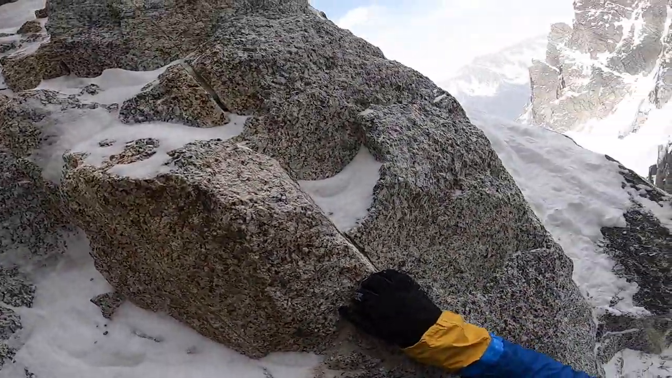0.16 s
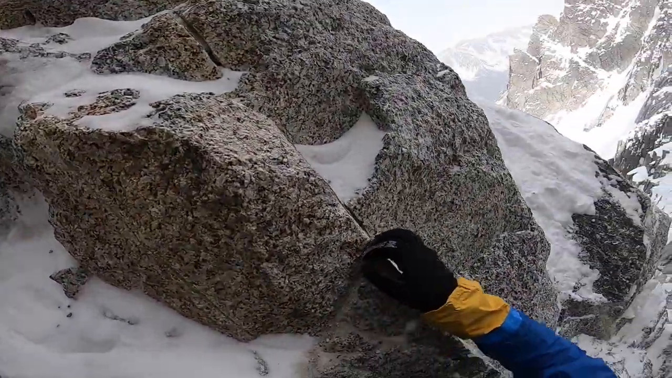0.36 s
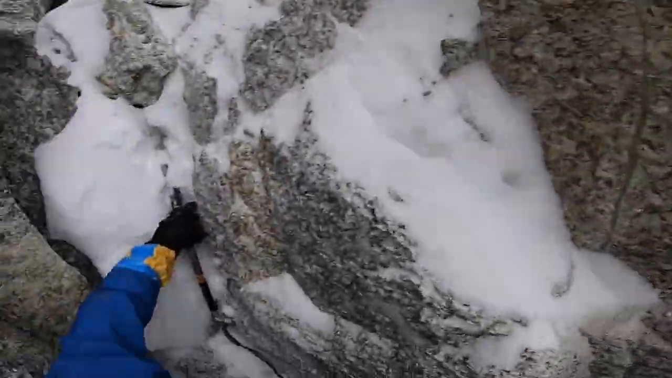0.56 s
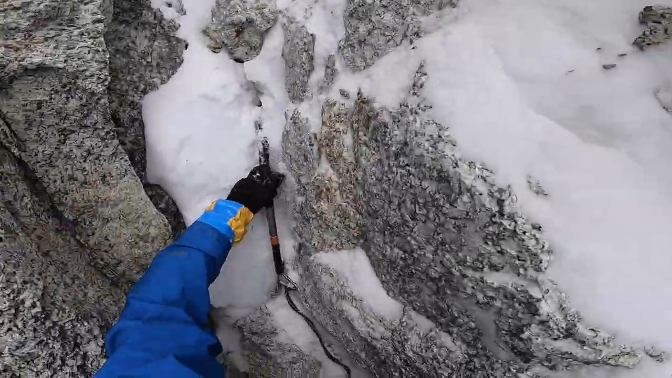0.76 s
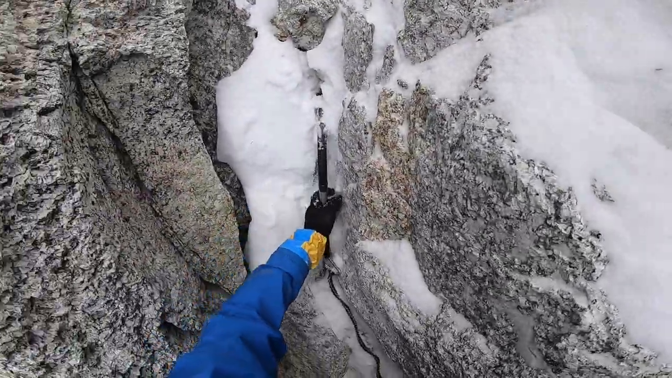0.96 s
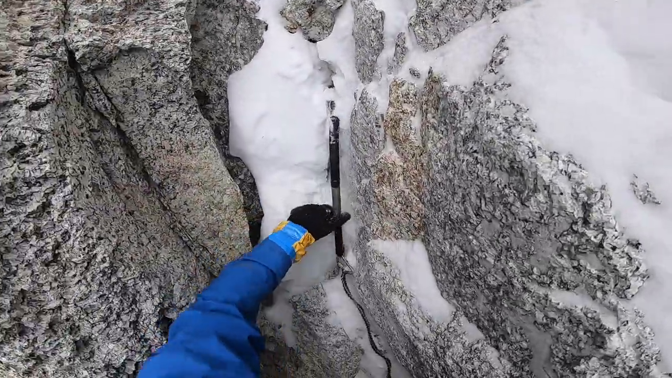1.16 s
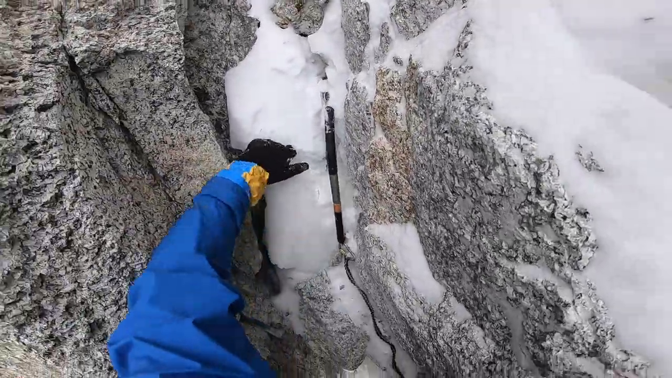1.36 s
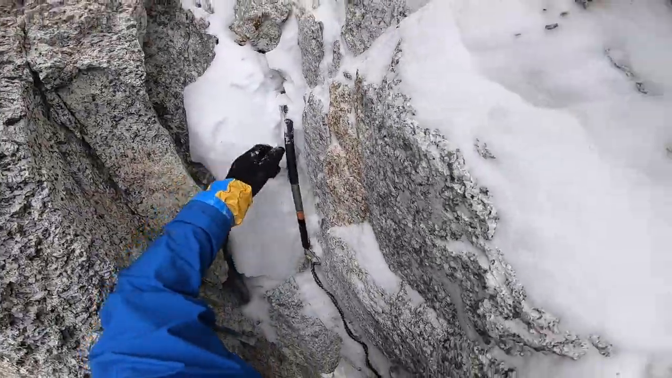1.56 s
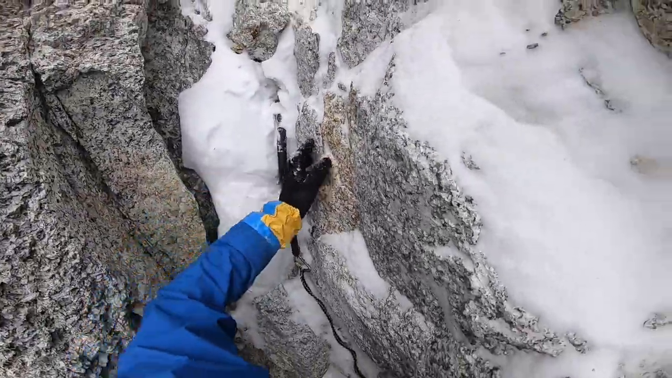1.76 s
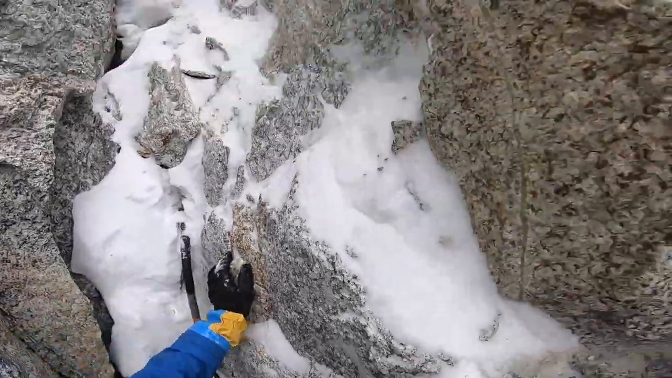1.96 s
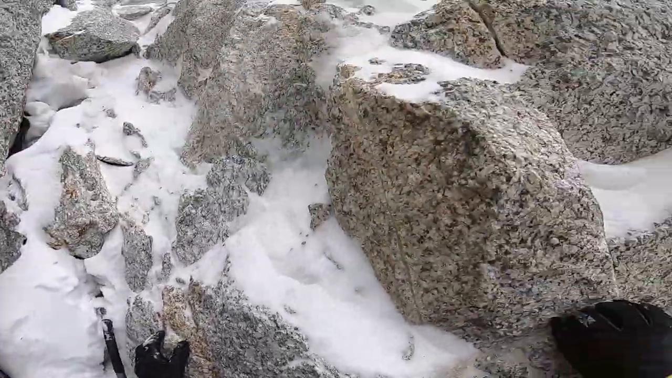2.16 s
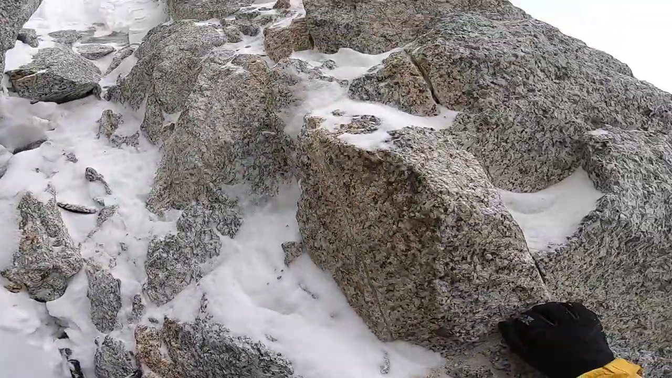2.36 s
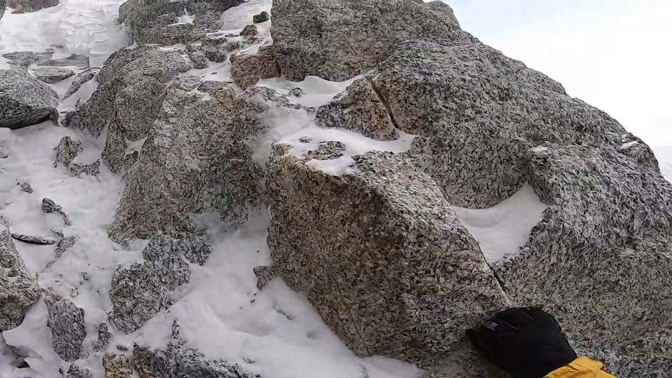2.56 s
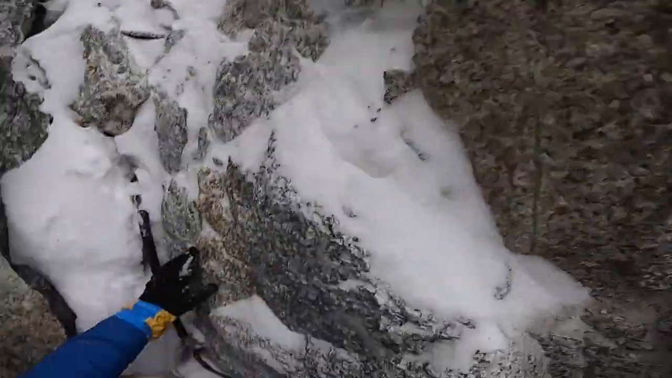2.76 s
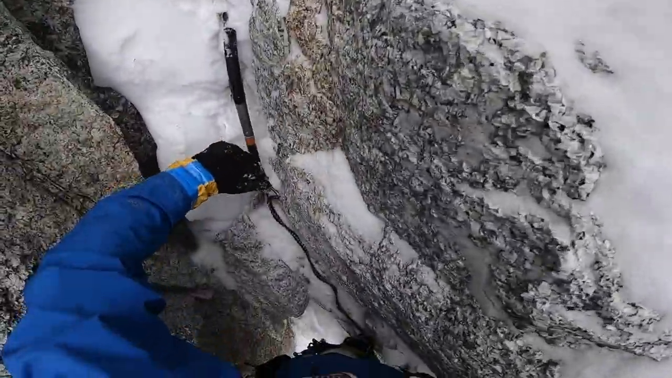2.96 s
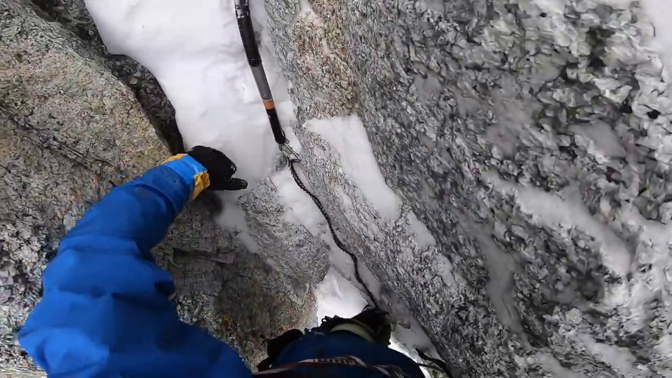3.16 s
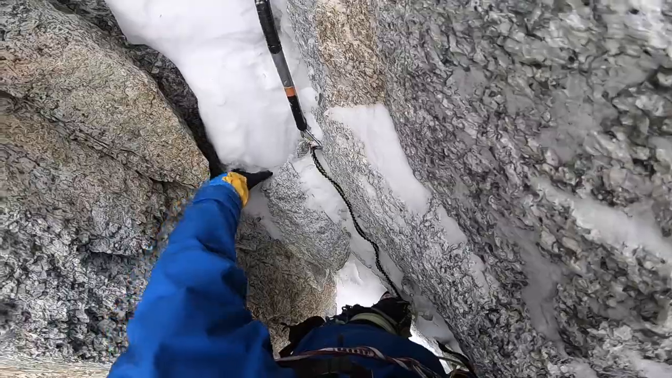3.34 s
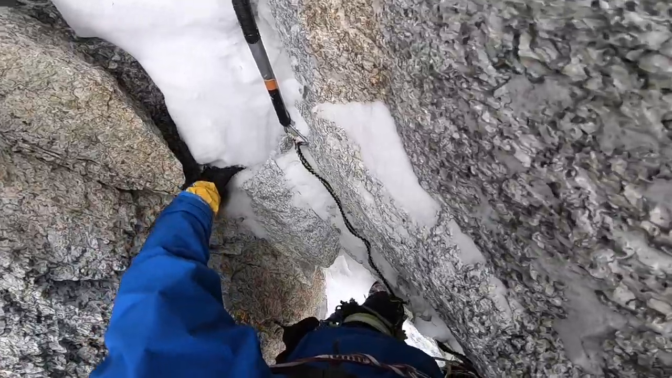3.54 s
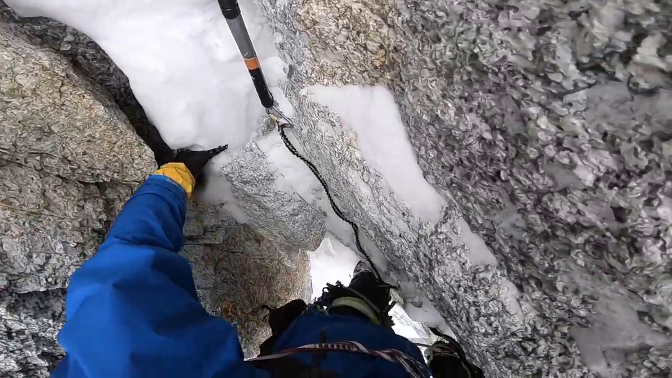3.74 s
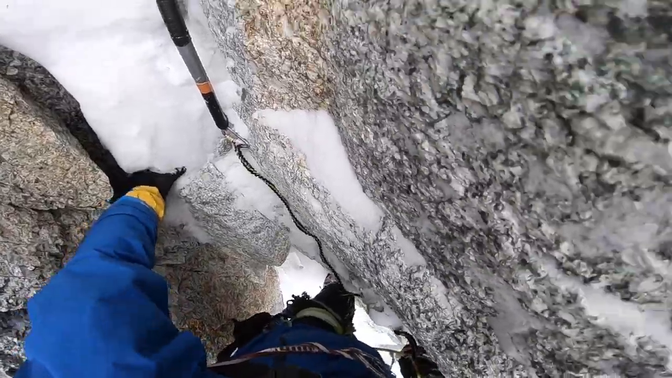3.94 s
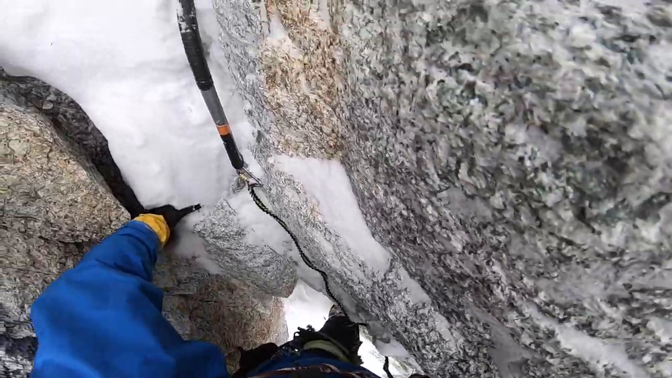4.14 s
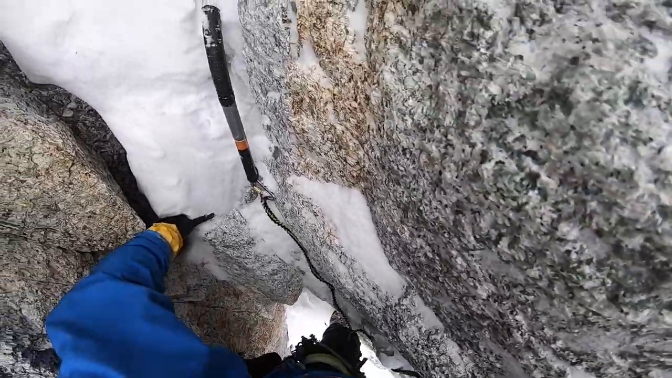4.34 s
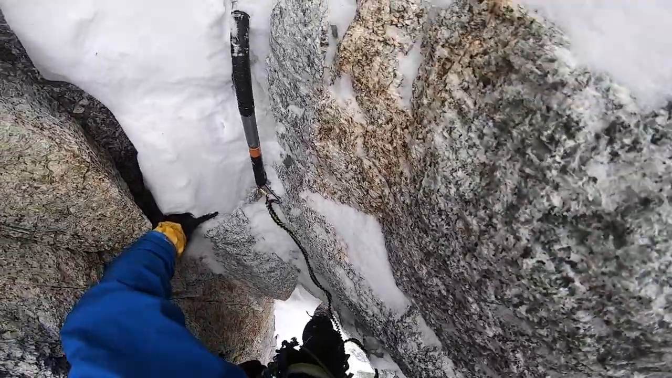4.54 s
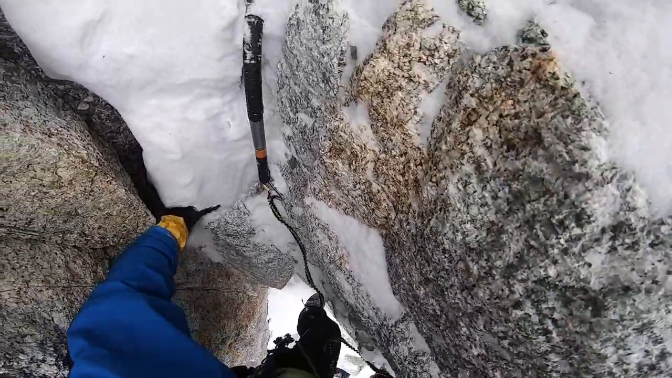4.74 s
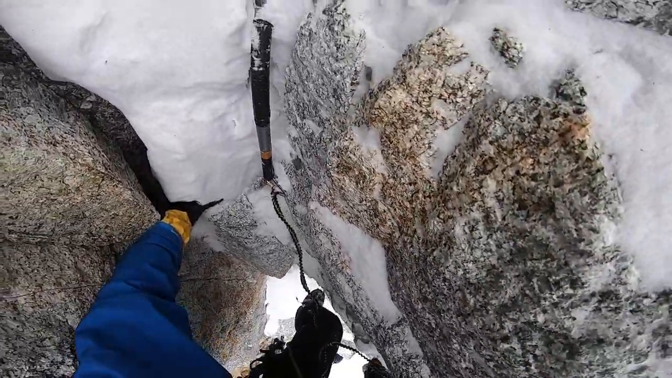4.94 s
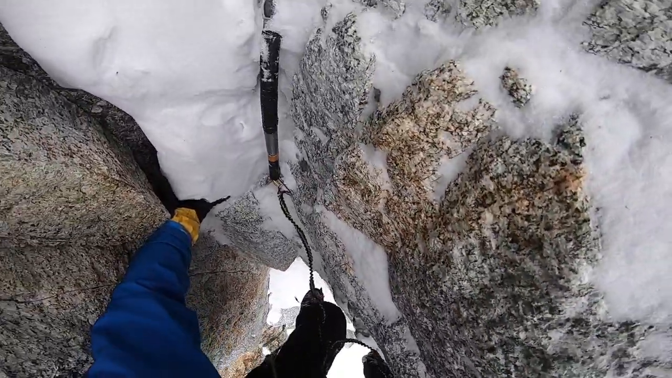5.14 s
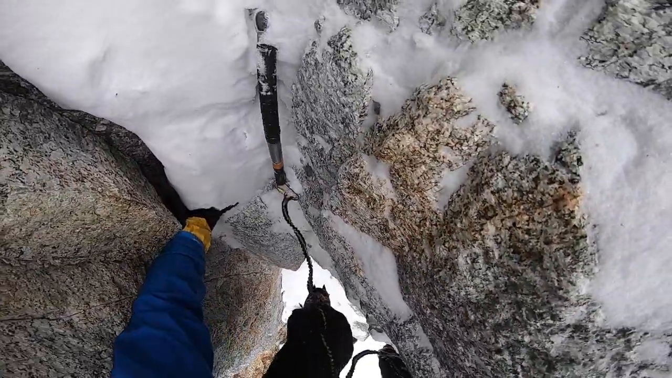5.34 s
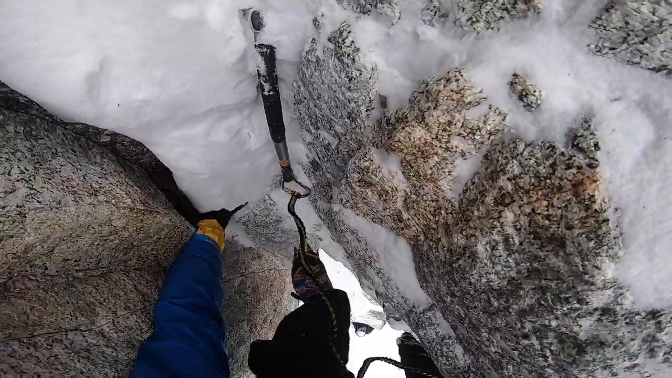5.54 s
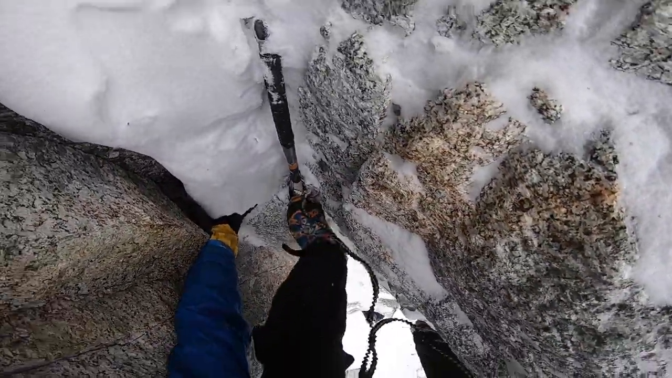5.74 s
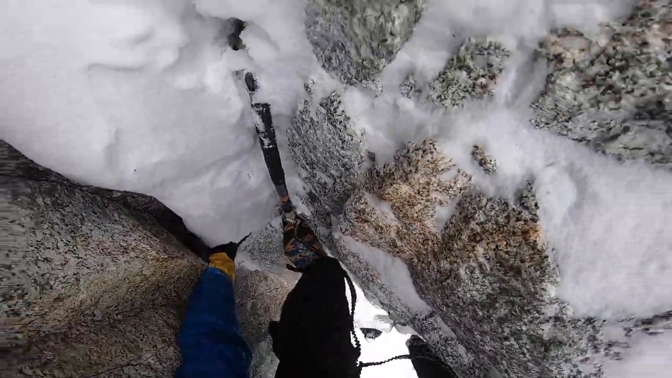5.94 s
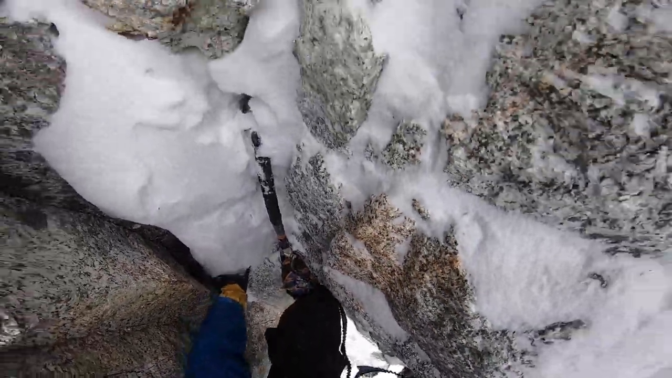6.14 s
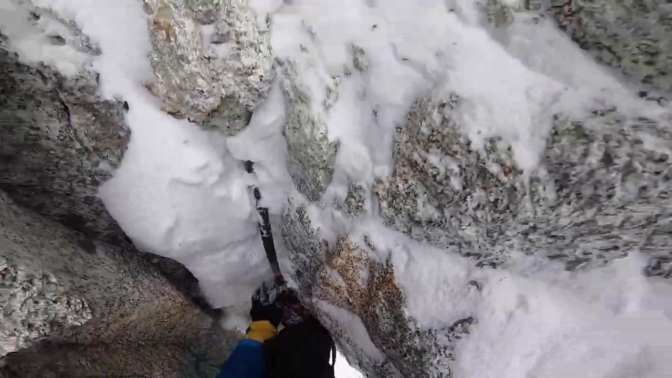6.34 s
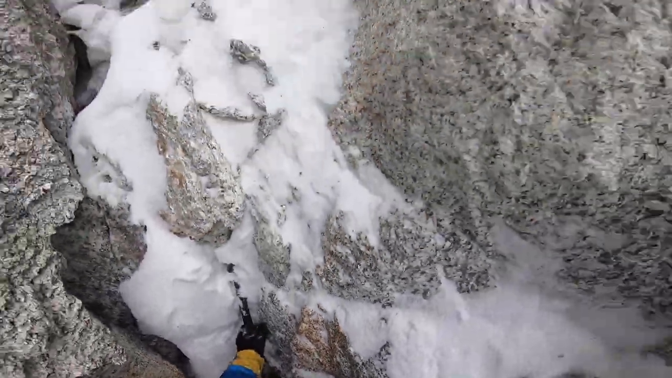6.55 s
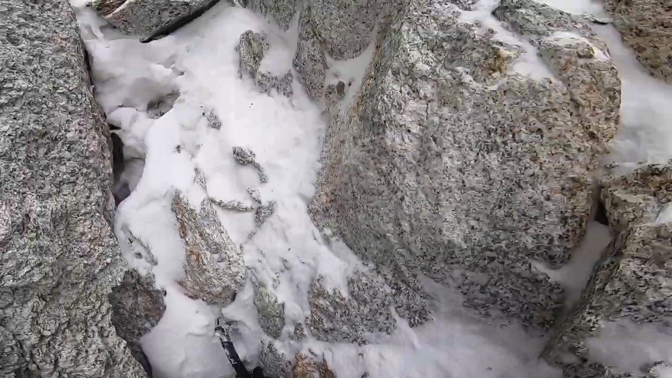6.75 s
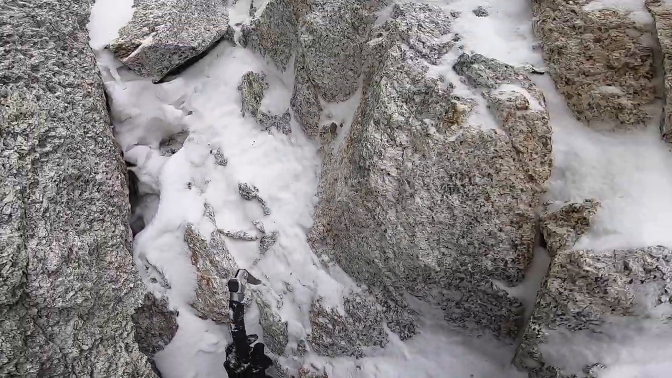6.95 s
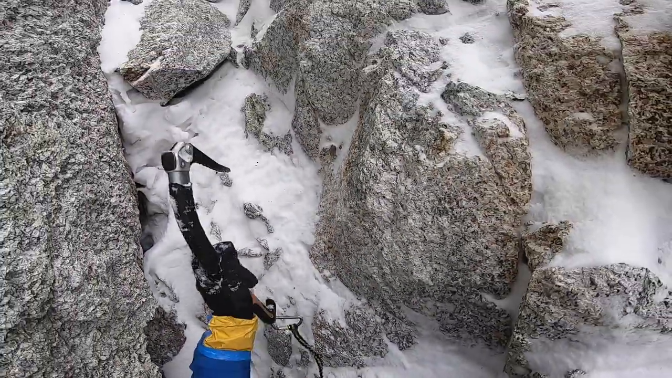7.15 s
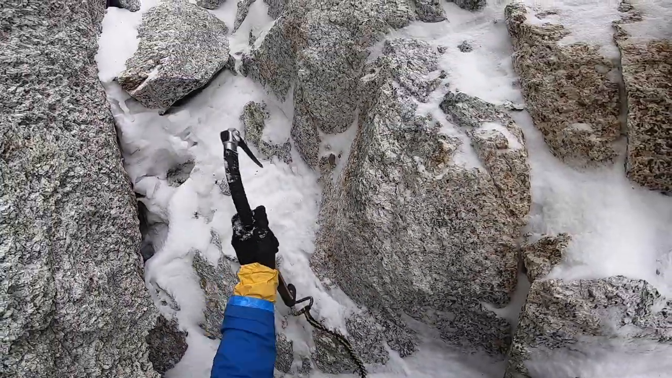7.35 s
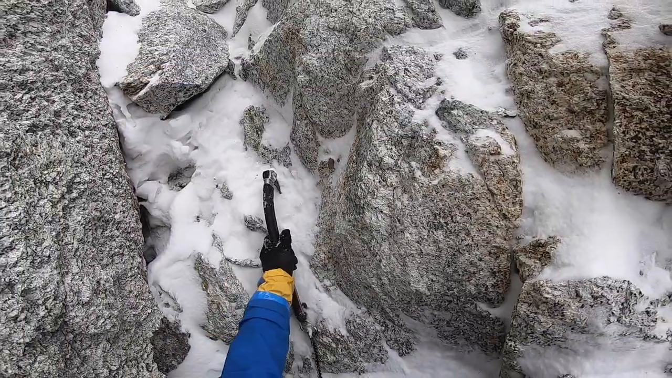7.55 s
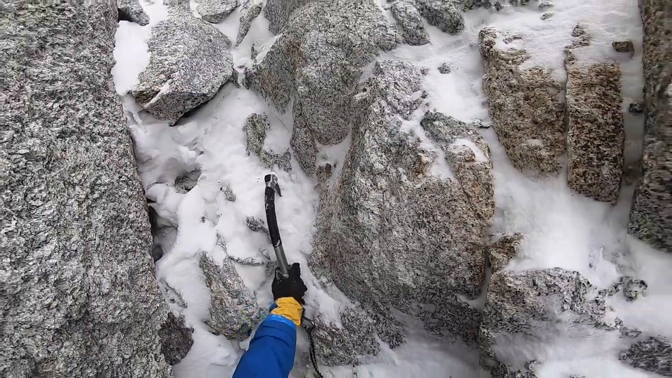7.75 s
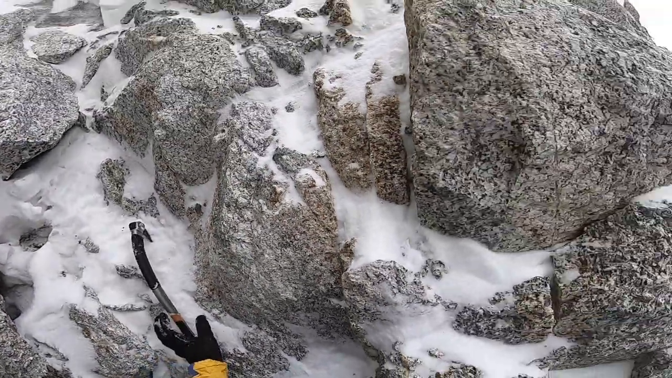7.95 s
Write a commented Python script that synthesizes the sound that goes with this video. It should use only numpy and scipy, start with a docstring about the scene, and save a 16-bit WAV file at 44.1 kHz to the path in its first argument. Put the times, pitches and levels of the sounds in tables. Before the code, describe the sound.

Close, dry outdoor sound from a helmet microphone, with faint low wind and unsteady bassy air rumble leaning right. At 0.3-0.6 s the mount creaks and knocks, with a soft thud and sleeve rustle. From 0.75 to 1.9 s gloves rasp in short coarse grains over crusted snow, strongest near 1.3-1.45, amid nylon swishes. A loud hollow case knock lands at 2.0, then a lull of rumble. At 3.0 a tool rattles and clinks on rock; cloth swishes and spikes skip at 3.46. Glove rasps at 3.8 lead to dense steel clicks, chirps and gritty scrapes from 4.1 to 4.8, over a low sole drone. Sparse clinks follow. At 5.8-6.1 a boot thumps packed snow with a brief squeak and clicks. A case knock at 6.47 and spikes at 6.6-6.8 precede light axe scratches, a sharp cracking bite at 7.47, and a final rustle near 7.9.

```python
"""Crampon points click and grind on granite as a climber moves up a snowy gully, heard at a camera on the helmet.
Steel and case are noise or taps ringing banks of resonances; drags add crystal snaps under a moving pressure.
An axe bites, a boot kicks packed snow, and gloves rasp over crust: bursts and grains of filtered noise.
Jacket swish and rustle are crackling noise that follows the climber's effort.
Air rumbles on the microphone ports, the mount shudders and creaks, and the housing knocks over faint wind."""
import sys
import numpy as np
from scipy import signal
from scipy.fft import rfft, irfft, next_fast_len
from scipy.io import wavfile
from scipy.ndimage import uniform_filter1d, map_coordinates

SR = 44100
rng = np.random.default_rng(int(sys.argv[2]) if len(sys.argv) > 2 else 0)


def unload_audio(sound):
    """Save the sound as a 16-bit wav file, at the path given as the first command line argument."""
    columns = np.transpose(np.atleast_2d(sound))
    # keep every value between -1 and 1, then stretch to whole-number steps
    steps = np.round(np.clip(columns, -1, 1) * 32767)
    wavfile.write(sys.argv[1], SR, steps.astype(np.int16))


N = 357210
TIME = np.arange(N) / SR
HIT = np.arange(SR // 4) / SR  # the time axis of one short event [s]

# Levels in the tables are relative: each layer is balanced again where it is mixed.
# resonances of the crampon frame: (frequency [Hz], width [Hz], level [dB])
CRAMPON = [(616, 40, -13), (796, 71, -10), (1296, 85, 8.5), (1770, 49, 9), (1936, 54, 9.5), (2356, 90, 4),
           (2530, 52, 0.5), (3480, 48, 4.5), (3660, 46, 1.5), (4210, 110, 1.5), (5030, 100, -8.5),
           (6260, 300, -1), (6490, 110, -0.5), (7020, 170, 0)]
# resonances of the camera case: (frequency [Hz], width [Hz], level [dB])
HOUSING = [(248, 88, -3.5), (476, 45, 2), (610, 46, 0), (810, 54, 6), (1520, 105, 7.5), (1900, 490, -0.5),
           (2820, 360, -4.5), (6200, 320, -2)]
# spectrum of crushed rock: (frequency [Hz], level [dB per Hz])
GRIT = [(150, -17), (350, 2), (900, 8.5), (2000, -3.5), (3600, 1.5), (4800, -6), (7000, -0.5), (8500, -10),
        (12000, -17.5), (15500, -54.5)]


def amp(db):
    """Decibels to gain."""
    return 10 ** (np.asarray(db) / 20)


def unit(x):
    """Scale to rms 1."""
    return x / np.sqrt(np.mean(x ** 2) + 1e-20)


def decay(t60):
    """Event envelope that falls by 60 dB in t60 seconds."""
    return amp(-60 * HIT / t60)


def noise_pair(size=N):
    """Two independent white noises."""
    return rng.standard_normal((2, size))


def along(points, hz):
    """Read (Hz, value) points on a log axis."""
    f, v = np.transpose(points)
    return np.interp(np.log(hz + 1), np.log(f), v)


def gains(rows):
    """One gain per sample for each dB column, silent beyond 10 ms outside the rows."""
    s, *cols = np.transpose(rows)
    active = (TIME > s[0] - .01) * (TIME < s[-1] + .01)
    return [amp(np.interp(TIME, s, c)) * active for c in cols]


def filtered(x, response):
    """Filter x by a complex response of frequency."""
    n = x.shape[-1]
    m = next_fast_len(n + 8192)  # room for ringing after the end
    return irfft(rfft(x, m) * response(np.fft.rfftfreq(m, 1 / SR)), m)[..., :n]


def colour(points, hz):
    """Causal response with the given spectrum, by folding its cepstrum."""
    cepstrum = irfft(np.log(amp(along(points, hz))))
    half = len(cepstrum) // 2
    return np.exp(rfft(np.r_[cepstrum[0], 2 * cepstrum[1:half], np.zeros(half)]))


def body(modes, hz):
    """Causal response of a set of resonances with alternating signs."""
    total = 0
    for k, (centre, width, db) in enumerate(modes):
        damping = 1j * hz * width
        total = total + (-1) ** k * amp(db) * damping / (centre * centre - hz * hz + damping)
    return total


def pan(x, left_db):
    """Lean a sound to the left port, or to the right when left_db is negative."""
    return x * np.array([amp(left_db / 2), amp(-left_db / 2)]).reshape(2, -1)


def out_of_step(radians, hz):
    """Phase by which the left port leads the right, split between the two."""
    return np.exp(.5j * np.outer([1, -1], along(radians, hz)))


def ports(pair, response):
    """An outside sound reaches the two ports partly direct, out of step, and partly scattered."""
    # (frequency [Hz], left-right likeness)
    alike = [(300, 0.6), (1400, 0.71), (3100, 0.65), (4800, 0.75), (6200, 0.28), (9000, 0.17), (15000, .15)]
    # (frequency [Hz], phase by which the left port leads [rad])
    lead = [(300, 0.6), (700, 1.0), (1000, 1.55), (1500, 1.33), (2200, 0.7), (3200, 0.1), (4800, -0.04),
            (6800, 2.5), (12000, 1.4)]
    # (frequency [Hz], left minus right [dB])
    lean = [(200, -3.5), (700, -4), (1400, -1.5), (2500, -2), (4500, -0.5), (7000, 2.5), (12000, -3)]

    def split(hz):
        turn = np.arccos(np.clip(along(alike, hz), -1, 1)) / 2
        return response(hz) * np.array([np.cos(turn), np.sin(turn)])

    direct, scattered = filtered(pair, split)
    both = np.array([direct + scattered, direct - scattered])
    return filtered(both, lambda hz: pan(out_of_step(lead, hz), along(lean, hz)))


def slips(rate, scatter_db, life, size=N):
    """Envelope of tiny slips of uneven size, about rate a second, dying over life seconds; rms 1."""
    sizes = amp(scatter_db * np.clip(rng.standard_normal(size), -2, 2))
    kicks = (rng.random(size) < rate / SR) * sizes
    return unit(signal.lfilter([1], [1, -np.exp(-1 / (life * SR))], kicks))


def steadied(x, seconds):
    """Even out the slow level changes of a noise."""
    return x / np.sqrt(np.abs(uniform_filter1d(np.mean(x ** 2, axis=0), int(seconds * SR))) + 1e-9)


def loudest(x):
    """The highest rms over any 2 ms."""
    return np.sqrt(uniform_filter1d(np.mean(x ** 2, axis=0), SR // 500).max())


def add(track, s, sound):
    """Mix a sound in at time s."""
    part = track[:, round(s * SR):][:, :sound.shape[1]]
    part += sound[:, :part.shape[1]]


def strokes(table, rise_s, fall_s, build_db=0):
    """Gain of (start, end, dB) movements: each swells in, builds and dies away (20 dB in rise_s, fall_s)."""
    t = TIME[::32]
    power = 0
    for start, end, db in table:
        outside = np.maximum(start - t, 0) / rise_s + np.maximum(t - end, 0) / fall_s
        build = np.interp(t, [start, end], [-build_db, 0])
        power = power + amp(db + build - 20 * outside) ** 2
    return np.interp(TIME, t, np.sqrt(power))


def patchy(x, depth_db, size=4):
    """Give contacts shifting colours: brief narrow patches of the spectrum stand out or sink."""
    z = signal.stft(x, nperseg=512)[2]
    field = uniform_filter1d(rng.standard_normal(z.shape[1:]), size=2, axis=0)
    field = uniform_filter1d(field, size=size, axis=1)
    patches = unit(amp(depth_db * np.clip(unit(field), -2.5, 2.5)))
    return signal.istft(z * patches, nperseg=512)[1][:, :x.shape[1]]


def surges(rate, depth_db):
    """A gain that swells and sinks at random, set anew rate times a second; rms 1."""
    knots = np.clip(rng.standard_normal(int(N * rate / SR) + 4), -1.5, 1.5)
    return unit(amp(depth_db * map_coordinates(knots, [TIME * rate])))


def gully():
    """Wind on the slope fills the lulls with a soft low rush of shaped noise."""
    # (frequency [Hz], level [dB per Hz])
    rush = [(120, 5.5), (330, -7), (550, -4), (1000, -30), (3000, -40)]
    return amp(-63) * unit(filtered(noise_pair(), lambda hz: amp(along(rush, hz))))


def housing(x, modes):
    """The case rocks, pushing the two ports with a phase and level difference that varies with pitch."""
    twist = [(900, 2.73), (1600, 2.47), (3000, 1.24), (6000, 1.7)]  # (frequency [Hz], left lead [rad])
    # (frequency [Hz], left minus right [dB])
    lean = [(250, -15.0), (700, -2.0), (1500, 2.5), (3000, 4.5), (6000, -8.0)]
    return filtered(x, lambda hz: body(modes, hz) * pan(out_of_step(twist, hz), along(lean, hz)))


def hollows():
    """The hollows of the case sing faintly in the breeze: steady noise through their resonances."""
    # (frequency [Hz], width [Hz], level [dB])
    cavities = [(213.8, 10, 11.5), (477, 36, -8), (795, 60, 0), (1520, 115, 6), (1800, 150, -13)]
    return amp(-58) * unit(housing(rng.standard_normal(N), cavities))


def shake(spectrum, lean, shared, even):
    """Low noise, partly common to both ports and stronger on the exposed one."""
    noise = noise_pair() + shared * rng.standard_normal(N)
    return steadied(filtered(noise, lambda hz: pan(amp(along(spectrum, hz)), along(lean, hz))), even)


def helmet():
    """Moving the head stirs air over the ports, shakes the mount and so rubs the case."""
    # the draught between turns: (time [s], level [dB])
    draught = [(0, -39), (.7, -34), (1.8, -43), (2.5, -35.5), (3.2, -37), (4.25, -29), (5.4, -29.5),
               (6.3, -30), (6.95, -36.5), (7.4, -46.5), (8.1, -32.5)]
    # quick head turns that push air over the ports: (start [s], end [s], level [dB])
    turns = [(.26, .31, -24.5), (.43, .62, -27), (1.0, 1.16, -38.5), (1.29, 1.33, -28.5), (1.5, 1.54, -40),
             (1.66, 1.7, -34), (1.92, 1.96, -26.5), (2.7, 2.8, -26), (2.91, 3.06, -31), (3.6, 3.64, -30.5),
             (4.74, 4.78, -26.5), (6.6, 6.72, -26.5), (7.51, 7.55, -28), (7.9, 8.02, -36.5)]
    # shifts of weight that set the mount shuddering: (start [s], end [s], level [dB])
    shifts = [(0, .03, -36.5), (.35, .48, -32), (.6, .66, -29), (.88, 1.05, -38.5), (1.96, 2.01, -24.5),
              (2.12, 2.45, -30.5), (2.6, 2.88, -33), (3.07, 3.12, -35), (3.38, 3.46, -41.5),
              (3.82, 4.62, -37), (4.75, 4.87, -28.5), (4.95, 5.13, -38), (5.55, 5.63, -32.5),
              (5.84, 5.91, -26.5), (6.0, 6.07, -28.5), (6.4, 6.8, -33), (6.88, 7.22, -42),
              (7.92, 8.03, -29.5)]
    # spectra of air and mount: (frequency [Hz], level [dB per Hz])
    air_spectrum = [(10, -8.5), (25, 0), (45, -9.5), (70, -14.5), (110, -25), (200, -31), (500, -61),
                    (1500, -83.5)]
    mount_spectrum = [(40, -39), (80, -4), (110, 0.5), (130, -3), (170, -34), (220, -16), (300, -57),
                      (700, -73.5)]
    # their balance: (frequency [Hz], left minus right [dB])
    air_lean = [(30, -18), (100, -13.5), (250, -4.5)]
    mount_lean = [(70, -20.5), (115, -19.5), (160, -8), (300, -13.5)]

    air = np.hypot(gains(draught)[0] * surges(rate=14, depth_db=4), strokes(turns, rise_s=.05, fall_s=.1))
    rumble = amp(5.5) * air * shake(air_spectrum, air_lean, shared=0.63, even=0.2)

    idle = amp(-51)  # the mount never quite rests
    shudder = np.hypot(idle, strokes(shifts, rise_s=.06, fall_s=.1)) * surges(rate=16, depth_db=2)
    mount = amp(3.0) * shudder * shake(mount_spectrum, mount_lean, shared=0.92, even=0.073)

    rub = np.hypot(amp(-23.5) * shudder, amp(-31) * air)  # the case rubs as it is shaken and turned
    grains = rng.standard_normal(N) * slips(410, 7.3, 0.012)
    rubbing = filtered(grains, lambda hz: 1 / (1 + 1j * hz / 700) / (1 + (hz / 3500) ** 2))
    return rumble + mount + amp(3.5) * rub * unit(housing(rubbing, HOUSING))


def knocks():
    """Play in the mount knocks the case and sets the camera swinging on its arm, a damped low tone."""
    # (time [s], peak level [dB], contact cut-off [Hz], mount thump [dB])
    table = [(0.336, -31, 1500, -23), (0.432, -24.5, 404, -16.5), (0.618, -11.5, 5560, -19),
             (0.869, -42, 400, -21.5), (1.976, -4.5, 960, -12), (2.0116, -14, 10200, -39),
             (2.672, -35, 420, -18.5), (3.092, -50, 400, -17), (6.0685, -24, 2850, -33),
             (6.413, -63, 400, -20), (6.471, -10.5, 6215, -28), (6.552, -40, 400, -23),
             (6.751, -45, 400, -23.5), (6.868, -48, 400, -27.5), (7.146, -60, 400, -28.5)]
    out = np.zeros((2, N))
    swing = np.sin(2 * np.pi * 116 * HIT) * decay(.15) * (1 - np.exp(-HIT / .004))
    for s, db, cut_hz, thump_db in table:
        tap = (HIT == 0) + 0.02 * rng.standard_normal(len(HIT)) * decay(0.0071)
        ring = housing(filtered(tap, lambda hz: 1 / (1 + 1j * hz / cut_hz) ** 3), HOUSING)
        add(out, s, amp(db) * ring / np.abs(ring).max() + amp(thump_db - 5.0) * pan(swing, -26.0))
    return out


def squeak(table, width_hz, overtone_db):
    """A loaded contact sticks and slips: a hoarse note and another about an octave up, on narrow noise."""
    s, db, hz = np.transpose(table)
    level, = gains(np.c_[s, db])
    phase = 2 * np.pi * np.cumsum(np.interp(TIME, s, hz)) / SR
    hoarse = filtered(noise_pair(), lambda hz: 1 / (1 + 1j * hz / width_hz) / (1 + (hz / 600) ** 2))
    hoarse = steadied(hoarse, 0.054)
    note = lambda k: hoarse[0] * np.cos(k * phase) + hoarse[1] * np.sin(k * phase)
    return level * pan(unit(note(0.97) + amp(overtone_db) * note(2)), -1)


def mount_creak():
    """The camera's mount creaks twice as its joint sticks and slips."""
    # (time [s], level [dB], pitch [Hz], sounded 3 % lower)
    path = [(.315, -81, 820), (.342, -46, 742), (.362, -47.5, 703), (.385, -64, 710), (.42, -120, 710),
            (1.87, -120, 819), (1.9, -64, 813), (1.94, -72, 808), (1.975, -52, 808)]
    return squeak(path, width_hz=44, overtone_db=-22)


def clothing():
    """Nylon slides on nylon: fine crackle over dull rustle; effort raises and brightens it, sweeps swell."""
    # how hard the body works, as the level of the rustle: (time [s], level [dB])
    work = [(0, -67.5), (.4, -54.5), (.95, -61), (1.35, -53.5), (1.8, -59.5), (2.0, -51.5), (2.14, -59.5),
            (2.48, -70), (2.95, -57), (3.45, -47.5), (3.85, -55), (4.3, -53.5), (4.95, -53), (5.2, -56),
            (5.85, -55.5), (6.28, -56.5), (6.62, -50.5), (6.95, -62), (7.5, -52), (7.65, -64.5),
            (7.9, -48.5), (8.1, -68)]
    # sweeps of a sleeve or trouser leg: (start [s], end [s], swish [dB], dull rustle [dB])
    sweeps = [(0.177, 0.19, -72, -52.5), (0.601, 0.64, -61, -45.5), (0.769, 0.89, -64, -54.5),
              (1.027, 1.48, -64, -55), (1.307, 1.405, -48.5, -63), (1.581, 1.59, -56.5, -53),
              (2.651, 2.87, -81, -60), (2.852, 2.973, -63, -51), (3.259, 3.34, -53, -58),
              (3.578, 3.93, -56, -58.5), (4.097, 4.11, -57, -46), (4.473, 4.62, -53.5, -47),
              (5.329, 5.68, -60.5, -60.5), (5.777, 6.03, -60.5, -53), (6.011, 6.03, -52, -42),
              (6.08, 6.19, -57, -46.5), (6.415, 6.92, -61, -76), (7.753, 7.7, -52.5, -70)]
    # spectra of the fine and the dull layer: (frequency [Hz], level [dB per Hz])
    nylon = [(1000, -32), (2200, -0.5), (3300, 5), (4600, -5), (6300, 8), (7300, 5), (8400, -2.5),
             (10500, 0), (13000, 4.5), (15500, -15.5)]
    rustle_spectrum = [(150, 8.5), (400, -5), (750, -4.5), (1300, -1.5), (1900, -3.5), (2600, -10),
                       (4000, -13), (8000, -28.5)]

    effort, = gains(work)
    start, end, swish_db, rustle_db = np.transpose(sweeps)
    # swish at an easy effort; it gains 1.2 dB per dB of effort
    creeping = amp(-70) * (effort / amp(-56.5)) ** 1.2
    swish = np.hypot(creeping, strokes(zip(start, end, swish_db), rise_s=0.074, fall_s=0.068))
    rustle = np.hypot(effort, strokes(zip(start, end, rustle_db), rise_s=0.026, fall_s=0.042))
    fine = ports(noise_pair() * slips(900, 5, .004), lambda hz: amp(along(nylon, hz)))
    dull = ports(noise_pair() * slips(900, 13.3, 0.012), lambda hz: amp(along(rustle_spectrum, hz)))
    fine = amp(8.5) * swish * unit(patchy(fine, depth_db=3))
    dull = amp(4.5) * rustle * unit(patchy(dull, depth_db=3.0))
    return pan(fine + dull, 0.95)


def wipes():
    """Crusted snow rasps as soon as a glove or sleeve bites into it, in coarse grains around a main ring."""
    # (start [s], end [s], level [dB], main ring [Hz], ring strength [dB])
    table = [(0.752, 0.866, -53, 1900, 17), (1.008, 1.068, -48.5, 1630, 1), (1.297, 1.397, -38.5, 3400, 1),
             (1.377, 1.439, -39, 1930, 2), (1.417, 1.457, -43, 3300, -9), (1.719, 1.756, -51.5, 2980, -2),
             (1.879, 1.942, -61.5, 1800, 2), (3.757, 3.814, -40.5, 3250, -3),
             (3.882, 3.948, -42, 3100, 4.5)]
    # the rasp's resonances: (frequency [Hz], width [Hz], level [dB])
    crust = [(1160, 390, -5.5), (1950, 320, -3), (3300, 630, -5), (6500, 910, -1), (12500, 3200, -11)]
    bite_s, lift_s = 0.0044, 0.009  # onset and release
    out = np.zeros((2, N))
    for start, end, db, ring_hz, ring_db in table:
        press = np.clip(HIT / bite_s, 0, 1) * np.clip((end - start - HIT) / lift_s, 0, 1)
        grains = noise_pair(len(HIT)) * slips(520, 4, .0025, len(HIT))
        main = [(ring_hz, 380, ring_db)]
        rasp = ports(grains, lambda hz: np.hypot(np.abs(body(crust, hz)), np.abs(body(main, hz))))
        add(out, start, amp(db) * press * steadied(rasp, .03))
    return out


def snow_squeak():
    """Snow squeezed under the boot sticks and slips with a wavering note."""
    # (time [s], level [dB], pitch [Hz], sounded 3 % lower)
    path = [(5.845, -51, 1393), (5.872, -46, 1484), (5.897, -35.5, 1520), (5.912, -45, 1527),
            (5.935, -47, 1520), (5.975, -51, 1416), (5.99, -56, 1430)]
    return squeak(path, width_hz=22, overtone_db=-19)


def thuds():
    """Packed snow takes a boot or axe with a short dull push; a harder blow rings shorter and higher."""
    # (time [s], peak level [dB], hardness as a pitch factor)
    table = [(0.367, -19, 1.19), (1.977, -30, 1.25), (5.829, -15.5, 0.99), (5.844, -16, 1.56),
             (5.864, -28, 3.04), (5.874, -10.5, 0.85), (5.89, -16, 0.93), (5.993, -25, 1.5),
             (6.018, -13.5, 1.26), (6.028, -15.5, 1.04), (6.068, -21, 1.3), (6.079, -20, 1.08),
             (6.135, -24.5, 1.74), (6.499, -23.5, 1.38), (7.4735, -19, 2.53)]
    # resonances at hardness 1: (frequency [Hz], width [Hz], level [dB])
    snowpack = [(100, 78.3, 1), (166.5, 41.7, 3.5), (270, 5.5, -21), (494, 51, -100)]
    out = np.zeros((2, N))
    for s, db, hardness in table:
        push = (HIT == 0) + 0.043 * noise_pair(len(HIT)) * decay(0.065)
        thud = filtered(push, lambda hz: body(snowpack, hz / hardness) / (1 + 1j * hz / (800 * hardness)))
        add(out, s, amp(db) * thud / np.abs(thud).max())
    return pan(out, -1.6)


def sole_rub():
    """A boot sole rubbing the wall drones low: slow slips through the boot's resonances."""
    # (start [s], end [s], level [dB])
    rubs = [(3.76, 3.8, -48), (3.95, 4.08, -47.5), (4.15, 4.33, -44.5), (4.46, 4.56, -41.5),
            (4.71, 4.83, -45), (4.87, 5.03, -50), (5.865, 5.93, -45), (6.0, 6.04, -43.5)]
    # (frequency [Hz], width [Hz], level [dB])
    boot = [(227, 46, 5), (292, 160, -2), (490, 47, 1), (664, 220, -9)]
    sole = ports(noise_pair() * slips(120, 2.2, 0.024), lambda hz: body(boot, hz))
    return strokes(rubs, rise_s=0.13, fall_s=0.022) * steadied(sole, 0.049)


def rattle():
    """A tool settling on rock chatters: light taps ring its few notes, shifted a little each time."""
    # (time [s], level [dB], contact cut-off [Hz]: a lower one stirs only the low notes)
    taps = [(3.0035, -33, 2500), (3.008, -27.5, 8000), (3.016, -42, 1300), (3.029, -31.5, 1800),
            (3.0325, -34, 1500), (3.0475, -34, 2600), (3.058, -33.5, 1400), (3.067, -41, 1500),
            (3.0805, -31, 1700), (3.088, -32, 4500), (3.1, -39, 5000), (3.128, -46.5, 5000),
            (3.159, -51, 4000), (3.191, -47, 6000)]
    # rings of shaft and blade: (frequency [Hz], width [Hz], level [dB])
    shaft = [(739, 15, -3), (843, 13, 3), (990, 100, -2.5), (1390, 50, 1.5), (1956, 61, 7), (2200, 84, -7),
             (3400, 25, 2), (3740, 76, -3)]
    out = np.zeros((2, N))
    for s, db, cut_hz in taps:
        tap = np.outer([1, 0], HIT == 0) + .06 * noise_pair(len(HIT)) * decay(.04)
        struck = []
        for mode_hz, width, level in shaft:
            shifted_hz = mode_hz * (1 + .018 * rng.standard_normal())
            struck.append((shifted_hz, width, level + 3.5 * rng.standard_normal()))
        contact = lambda hz: 1 / (1 + 1j * hz / cut_hz) ** 2
        ring = ports(tap, lambda hz: (body(struck, hz) + amp(-18) * colour(GRIT, hz)) * contact(hz))
        add(out, s, amp(db) * ring / loudest(ring))
    return out


def strikes(table, modes, bright_db, note_db, note_width_hz, grit_db, spray_db, spray_t60, scatter_db, crack_db):
    """Each blow cracks and crushes the surface, rings the steel at new strengths and sprays crumbs."""
    out = np.zeros((2, N))
    for s, db, low_db, high_db, note_hz, crush_t60 in table:
        force = decay(crush_t60) + amp(spray_db) * decay(spray_t60)
        struck = [(hz, width, level + scatter_db * rng.standard_normal()) for hz, width, level in modes]
        struck.append((note_hz, note_width_hz, note_db))
        steel_and_grit = lambda hz: body(struck, hz) + amp(grit_db) * colour(GRIT, hz)
        ring = ports(force * noise_pair(len(HIT)), steel_and_grit)
        hardness = [(900, low_db - 7.0), (2000, low_db + 0.5), (3500, -5.0), (5300, high_db + bright_db)]
        ring = filtered(ring, lambda hz: colour(hardness, hz))
        burst = noise_pair(len(HIT)) * decay(0.4 * crush_t60)
        crack = filtered(burst, lambda hz: (1j * hz / (5500 + 1j * hz)) ** 2)
        add(out, s, amp(db) * (ring / loudest(ring) + amp(crack_db) * crack / loudest(crack)))
    return out


def axe_pick():
    """The axe pick bites and frees chips, with a strong crack and a broad ring."""
    # (time [s], level [dB], body [dB], splinter [dB], note [Hz], crush t60 [s])
    blows = [(7.0803, -47, -22, -17, 4120, 0.024), (7.1736, -36.5, -17, -14, 4720, 0.015),
             (7.3376, -28, 4.5, -10.5, 1960, 0.038), (7.4006, -44, -20, -19.5, 1840, .04),
             (7.4315, -37, -27, -20, 4386, 0.033), (7.4544, -26.5, -24, -23, 3300, 0.044),
             (7.4642, -19.5, -19, -16, 3450, 0.056), (7.467, -18, -9.5, -9, 3370, 0.057),
             (7.4728, -9.5, -1.5, -6, 5150, 0.018), (7.5176, -36, 4, -6, 3310, 0.03),
             (7.5468, -35, -28, -18, 3750, 0.047), (7.5583, -35, 6.5, -1, 3754, 0.072),
             (7.8068, -34, -4, -12, 2220, 0.17)]
    # (frequency [Hz], width [Hz], level [dB])
    axe = [(347, 62, 2), (920, 316, 18.5), (1600, 1100, 3.5), (2750, 410, -21), (3450, 250, 2),
           (5150, 1000, 2), (6100, 770, 8), (6300, 190, 3.5), (6370, 380, 3.5)]
    bites = strikes(blows, axe, bright_db=4, note_db=8, note_width_hz=300, grit_db=3,
                    spray_db=-17, spray_t60=.07, scatter_db=1.5, crack_db=-3)
    return amp(-5.0) * pan(bites, 2.1)


def grating():
    """Held against one rough edge, a point keeps a main ring, with two more sounding below it."""
    # (start [s], end [s], level [dB], main ring [Hz])
    table = [(3.898, 3.938, -39, 2760), (3.979, 3.993, -43, 3580), (4.182, 4.212, -42, 2090),
             (4.511, 4.546, -39.5, 1700), (5.986, 6.007, -43.5, 2770), (6.67, 6.71, -48, 1740)]
    out = np.zeros((2, N))
    for start, end, db, ring_hz in table:
        load = np.interp(HIT, [0, .006, end - start - .008, end - start], [0, 1, .8, 0])
        modes = [(ring_hz / 2, 180, -1), (0.73 * ring_hz, 150, -4), (ring_hz, 130, 1)]
        rasp = ports(noise_pair(len(HIT)) * slips(600, 4.4, 0.0057, len(HIT)), lambda hz: body(modes, hz))
        add(out, start, amp(db) * load * unit(rasp))
    return out


def pings():
    """A steel tip that springs free of its edge rings briefly with one clean note."""
    # (time [s], level [dB], pitch [Hz])
    table = [(3.1, -40, 3410), (5.0935, -38.5, 3450), (6.826, -41.5, 3480), (7.338, -34, 2050),
             (7.597, -45, 7040)]
    out = np.zeros((2, N))
    for s, db, pitch_hz in table:
        ring = np.sin(2 * np.pi * pitch_hz * HIT) * amp(db) * decay(0.045) * (1 - np.exp(-HIT / .001))
        add(out, s, np.array([ring, ring]))
    return out


def skips():
    """A point skipping as the foot slides on chirps briefly, each time at its own pitch."""
    # (time [s], level [dB], pitch [Hz])
    table = [(3.4716, -42, 1950), (3.474, -38.5, 1080), (3.477, -39, 1440), (3.4807, -50, 2040),
             (4.181, -41, 2090), (4.311, -44, 2240), (4.563, -35, 1860), (4.613, -40, 2000),
             (4.635, -39, 1950), (4.692, -45, 1900), (4.716, -42, 1800), (4.76, -41, 1840),
             (4.782, -44, 1800), (4.804, -40.5, 1760), (4.826, -41, 1600), (4.917, -41, 1740),
             (4.936, -40, 1900), (4.98, -50, 1810), (5.07, -46, 1320), (6.609, -39, 1630),
             (6.6227, -27.5, 1579)]
    out = np.zeros((2, N))
    for s, db, pitch_hz in table:
        catch = noise_pair(len(HIT)) * decay(0.023)
        chirp = ports(catch, lambda hz: body([(pitch_hz, 400, 0)], hz) ** 2 + amp(-22) * body(CRAMPON, hz))
        add(out, s, amp(db) * chirp / loudest(chirp))
    return out


def teeth(scatter_db, life):
    """Envelope of sharp snaps, as a dragged point jumps over crystals at a loosely even pace; rms 1."""
    pace = 230 * surges(rate=300, depth_db=4)  # crystals per second
    sizes = amp(scatter_db * np.clip(rng.standard_normal(N), -1.5, 1.5))
    snaps = np.diff(np.floor(np.cumsum(pace) / SR), prepend=0) * sizes
    return unit(signal.lfilter([1], [1, -np.exp(-1 / (life * SR))], snaps))


def scraping():
    """Dragged points snap over granite crystals, now and then a big one, and ring the crampon frame."""
    # (start [s], end [s], level [dB])
    drags = [(3.458, 3.477, -42), (4.088, 4.12, -46), (4.185, 4.21, -43), (4.31, 4.38, -55),
             (4.417, 4.445, -35.5), (4.463, 4.538, -29), (4.565, 4.588, -29.5), (4.63, 5.09, -52.5),
             (5.82, 5.86, -57), (6.01, 6.15, -67), (6.62, 6.69, -50)]
    pressure = strokes(drags, rise_s=0.014, fall_s=0.0064, build_db=2.5)
    fine_grinding = slips(1100, 3.8, .0016)
    bite = np.hypot(fine_grinding, amp(0.5) * teeth(scatter_db=3.5, life=.0005))
    bite = np.hypot(bite, 1.6 * slips(75, 2, .0016))  # the big crystals
    catches = noise_pair() * bite
    steel = ports(catches, lambda hz: body(CRAMPON, hz) + amp(-10) * colour(GRIT, hz))
    steel = patchy(steel, depth_db=2, size=9)
    return amp(-1.5) * pressure * pan(steadied(steel, 0.044), -2.5)


def crampon_points():
    """Crampon points meet rock: each click rings the frame and the point's own note over crushed grit."""
    # (time [s], level [dB], clank [dB], ping [dB], the point's own note [Hz], crush t60 [s])
    clicks = [(2.9563, -28, -6.5, -10.5, 3540, 0.048), (3.0036, -20.5, 1.5, -12.5, 2200, 0.034),
              (3.0876, -26, -11, -9, 3500, 0.068), (3.458, -27, 15, -9, 1220, 0.027),
              (3.4734, -23, 15, -18, 1380, 0.0076), (4.0893, -29, 2, -12, 2260, 0.024),
              (4.101, -30, 0, 2, 6700, 0.022), (4.146, -27, -23, -7, 4670, 0.0076),
              (4.261, -35, -8, 5, 3300, 0.017), (4.284, -35, -4, -4, 2200, .015),
              (4.2905, -29.5, 3, -11, 4200, 0.016), (4.329, -30, -1.5, -6, 2080, .025),
              (4.374, -26.5, -1.5, -1, 7830, 0.049), (4.437, -26, -18, -15, 3840, 0.019),
              (4.461, -29, 2, -15, 1420, 0.019), (4.4801, -21, -31, -16, 3850, 0.012),
              (4.493, -52, 4, -4, 1370, .02), (4.511, -20, -29, -7, 1400, 0.035),
              (4.534, -21, -14, -7, 2480, 0.016), (4.5781, -25, -3, -14, 1300, 0.013),
              (4.6539, -30.5, 0, -9, 1420, 0.1), (5.0926, -36.5, -15, -11, 3270, 0.035),
              (5.0414, -32, -9, -15, 1440, .02), (5.482, -30.5, 26, -22, 1130, 0.014),
              (5.5168, -26.5, -4, -5.5, 3800, 0.013), (5.8194, -30.5, -6, -1, 1300, 0.041),
              (5.8384, -25, 1, -3, 1490, 0.014), (5.9602, -23, -5.5, -17, 3230, 0.018),
              (6.0095, -21.5, -2, 3, 2130, 0.033), (6.0297, -26, 2, 13, 1480, 0.029),
              (6.068, -21, 6, -19, 2270, 0.018), (6.623, -24.5, 3, 2, 4340, 0.045),
              (6.637, -30, 2, -7, 2150, 0.026), (6.666, -33, 2, -6, 1800, 0.037),
              (6.6862, -26.5, -7, -11.5, 4400, 0.032), (6.775, -20.5, -3.5, -2, 1726, 0.02),
              (6.7802, -24, -23, 5, 3496, 0.02), (6.8254, -32, -1, -17, 990, 0.02)]
    clinks = strikes(clicks, CRAMPON, bright_db=2, note_db=9, note_width_hz=90, grit_db=1,
                     spray_db=-16, spray_t60=.07, scatter_db=2.5, crack_db=-12)
    return amp(-8.0) * pan(clinks, -0.72)


def scene():
    """Everything is within reach, and the snow swallows all echoes."""
    camera = hollows() + helmet() + knocks() + mount_creak()
    snow = wipes() + snow_squeak() + thuds()
    tools = rattle() + axe_pick()
    crampons = grating() + pings() + skips() + scraping() + crampon_points()
    return gully() + camera + clothing() + snow + sole_rub() + tools + crampons


def record(dry):
    """The microphone dulls toward the camera's band limit, and nothing passes above it."""
    # (frequency [Hz], level [dB])
    microphone = [(7500, -0.5), (9000, -3.5), (13000, -20), (15400, -17)]
    top_hz = 15400
    return filtered(dry, lambda hz: amp(along(microphone, hz)) * (hz < top_hz))


dry = scene()
out = record(dry)
unload_audio(out)
```